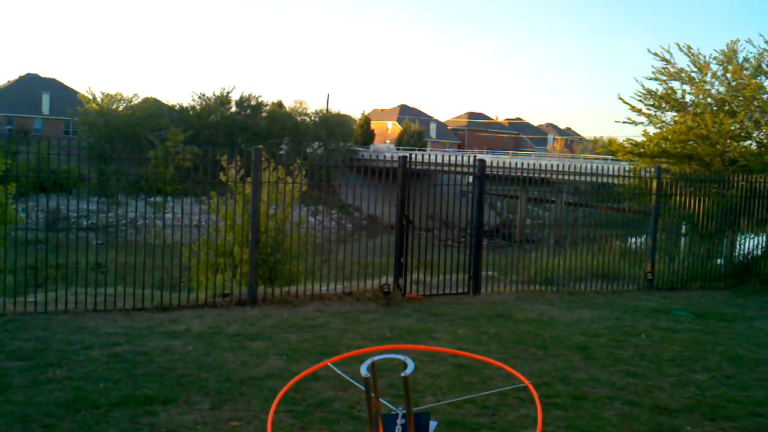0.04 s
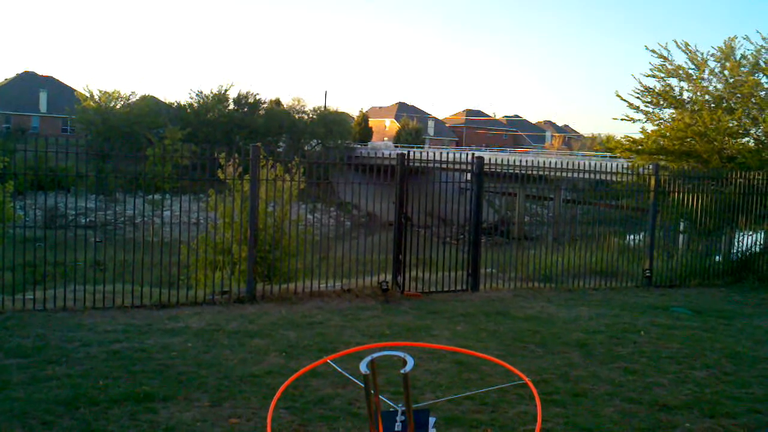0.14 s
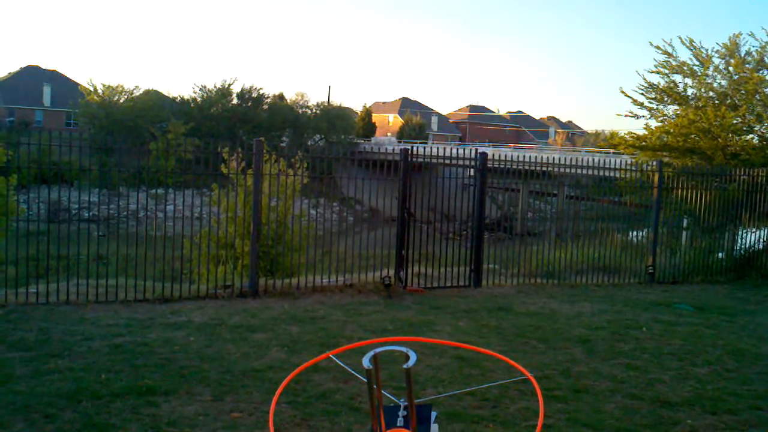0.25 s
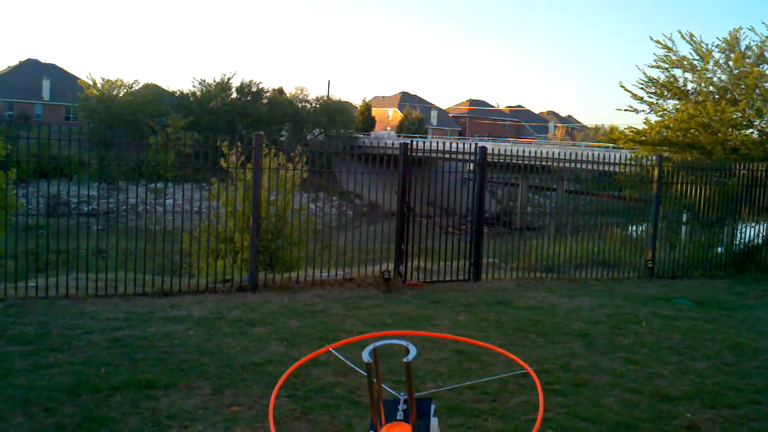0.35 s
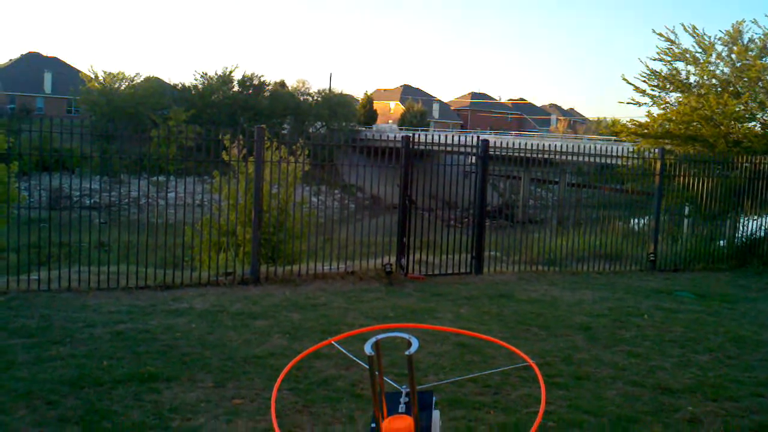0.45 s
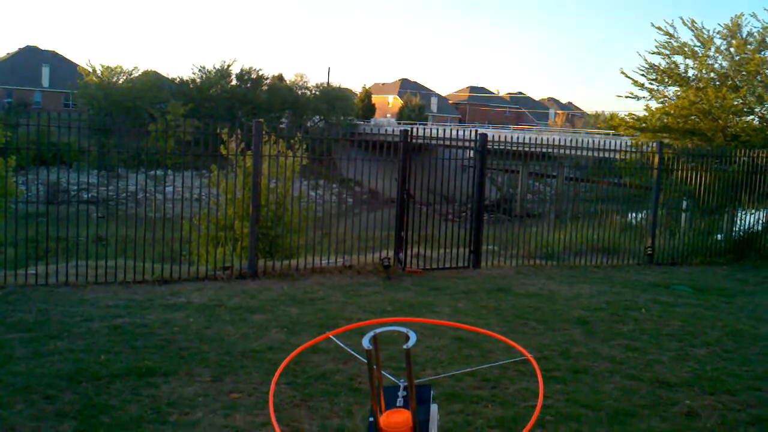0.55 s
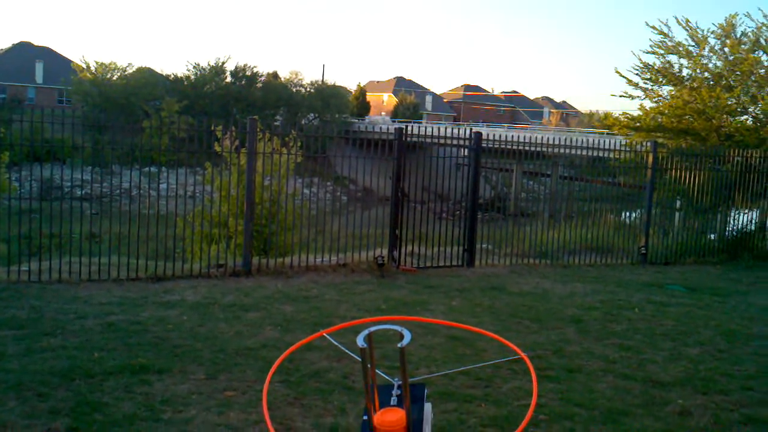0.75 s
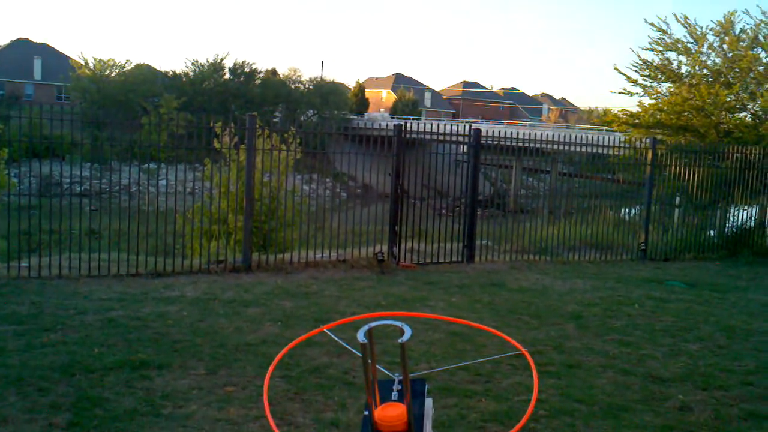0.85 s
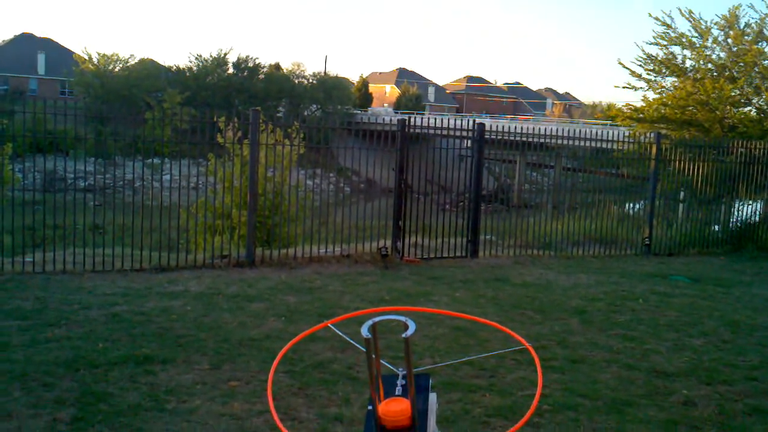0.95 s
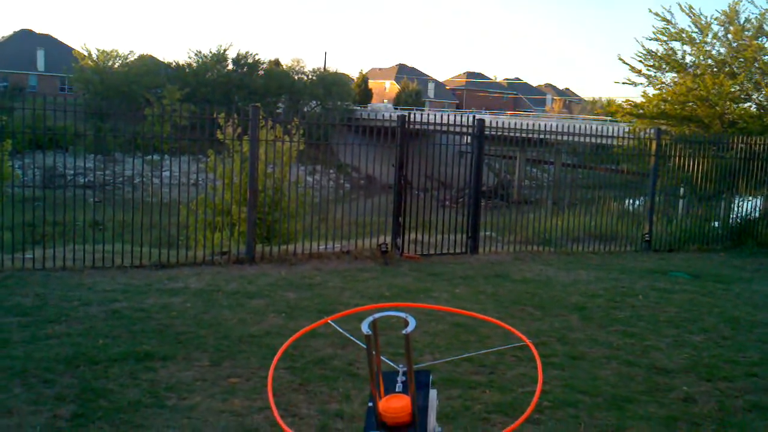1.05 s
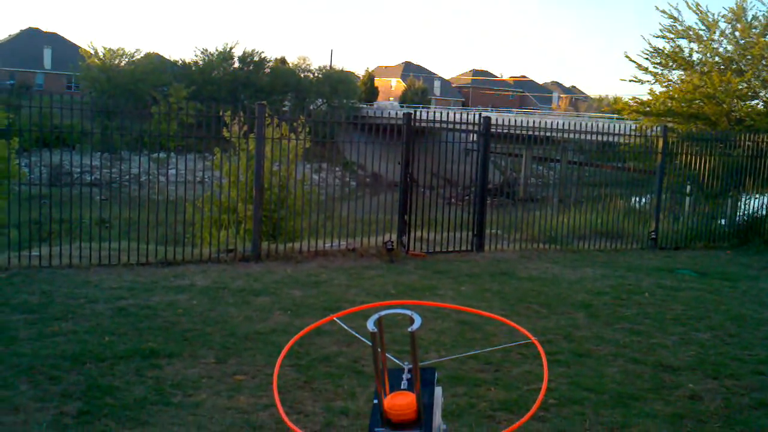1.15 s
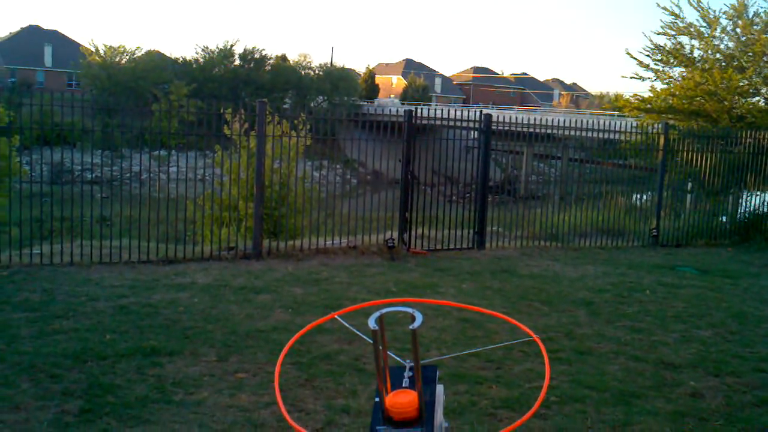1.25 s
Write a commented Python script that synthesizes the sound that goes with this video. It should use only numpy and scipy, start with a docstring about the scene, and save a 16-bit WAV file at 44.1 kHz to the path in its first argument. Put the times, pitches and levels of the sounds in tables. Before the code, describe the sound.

Close steel clack of a clay launcher, then a softer knock, with faint traffic hum outdoors.

```python
"""On a lawn, distant traffic hums throughout, with a faint hiss off to the right. A spring-driven clay
launcher fires just in front of the microphone: its steel arm clacks and chatters, jolting the stand,
and fence and houses return a thin tail. The arm swings back against its stop with a weaker, rattling
knock. A soft rustle follows, and near the end the hiss swells while the traffic grows a little."""
import sys
import numpy as np
from scipy import signal
from scipy.fft import rfft, irfft
from scipy.io import wavfile

SR = 44100
rng = np.random.default_rng(int(sys.argv[2]) if len(sys.argv) > 2 else 0)


def master(y):
    """Save y as 16-bit WAV."""
    cut = np.clip(np.atleast_2d(y).T, -1, 1)
    pcm = np.round(cut * 32767)  # scale
    wavfile.write(sys.argv[1], SR, pcm.astype(np.int16))


N = 57330
BIN_HZ = np.fft.rfftfreq(N, 1 / SR)


def undb(db):
    """Decibels to gain."""
    return 10 ** (np.asarray(db) / 20)


def since(start):
    """Seconds since a moment, zero before it."""
    return np.maximum(np.arange(N) / SR - start, 0)


def over_time(points):
    """Gain along a (time [s], level [dB]) curve."""
    return undb(np.interp(since(0), *np.array(points).T))


def over_bins(points):
    """A (frequency [Hz], value) curve on every frequency bin."""
    hz, value = np.array(points).T
    return np.interp(np.log(BIN_HZ + 1), np.log(hz), value)


def pan(right_db):
    """Left and right gains for a level difference."""
    return undb(np.array([[-.5], [.5]]) * right_db)


def noise(colour, likeness=0, body=1):
    """Unit-level stereo noise with a colour, a left-right correlation (held to -1..1) and resonances."""
    mid, side = rfft(rng.standard_normal((2, N)))
    correlation = np.clip(likeness, -1, 1)
    spectrum = mid * np.sqrt(1 + correlation) + side * np.sqrt(1 - correlation) * np.array([[1], [-1]])
    x = irfft(spectrum * undb(over_bins(colour)) * body, N)
    return x / np.std(x)


def decay(t, t60_s, attack_s=.0003):
    """A quick rise, then a fall of 60 dB in t60_s."""
    return (1 - np.exp(-t / attack_s)) * np.exp(-np.log(1000) * t / t60_s)


def drone(hz, width_hz):
    """A narrow band of noise, heard as a wavering tone of unit level."""
    band = np.exp(-2 * ((BIN_HZ - hz) / width_hz) ** 2)
    x = irfft(rfft(rng.standard_normal(N)) * band, N)
    return x / np.std(x)


# colour of the road from far off (frequency [Hz], relative level [dB])
TRAFFIC_COLOUR = [(25, -9), (50, -12), (80, -4.5), (120, -0.5), (200, -0.5), (320, -1.5), (470, -1.5),
                  (650, -3), (850, 0.5), (1050, 2.5), (1400, -7.5), (2000, -17.5), (2600, -19),
                  (3400, -30.5), (5200, -40.5), (8000, -35), (14000, -34.5)]
# its likeness across the microphone (frequency [Hz], left-right likeness [ratio])
TRAFFIC_LIKENESS = [(60, -0.7), (130, -0.33), (280, 0.4), (620, 0.31), (1100, 1), (2000, 0.38),
                    (2500, -1.3), (2800, -1), (3800, 0.11)]
# its slow rise (time [s], level [dB])
TRAFFIC_LEVEL = [(0, -47.5), (.35, -46), (.65, -46.5), (1.0, -44.5), (1.3, -44.5)]
# drones within it (frequency [Hz], width [Hz], starting level [dB], growth [dB/s])
DRONES = [(204, 32, -64, 1.5), (469, 10, -68, 8), (953.4, 12, -65, 5), (1066.5, 28, -70.5, 13)]
def traffic():
    """Engine hum and tyre roar carry to the lawn from a distant road, slowly growing."""
    roar = noise(TRAFFIC_COLOUR, over_bins(TRAFFIC_LIKENESS)) * over_time(TRAFFIC_LEVEL)
    drones = sum(undb(db + growth * since(0)) * drone(hz, width) for hz, width, db, growth in DRONES)
    return (roar + drones) * pan(right_db=0.1)


# colour of the hiss (frequency [Hz], relative level [dB])
HISS_COLOUR = [(900, -22), (1900, 13.5), (2650, -30.5), (3400, 2), (5400, -13), (7200, -7.5),
               (10000, -20.5), (14000, -16.5)]
# its fade and late swell (time [s], level [dB])
HISS_LEVEL = [(0, -61), (.08, -64.5), (.8, -76), (.9, -61.5), (1.02, -58.5), (1.15, -59.5), (1.3, -68)]
def hiss(left_lag_s=.00025):
    """A faint hiss off to the right, reaching that side of the microphone first."""
    left, right = noise(HISS_COLOUR, likeness=0.34) * over_time(HISS_LEVEL)
    return np.array([np.interp(since(left_lag_s), since(0), left), right])


# blows of the firing arm (time [s], then relative levels: ring [dB], clatter [dB], chink [dB], crack [dB])
CLACK_BLOWS = [(0.1000, 3, -26.5, -46, -19.5), (0.1038, -13.5, -26, -33, -29),
               (0.1293, -28, -27.5, -34, -26), (0.1335, -40, -32, -48, -36), (0.1505, -45, -46, -43, -41),
               (0.1635, -37, -30, -60, -56)]
# modes of the steel arm (frequency [Hz], relative level [dB], t60 [s])
ARM_MODES = [(776, -33.5, .19), (1020, -27.5, .22), (1054, -32, .24), (1138, -39, .18), (1190, -27, .2),
             (1239, -35.5, .17), (1295, -37.5, .22), (1363, -29, .2), (1561, -38.5, .22), (1664, -37, .22),
             (1729, -36.5, .24), (1799, -38.5, .2), (1929, -33, .19), (2762, -43, .27), (2788, -38.5, .27)]
# dense modes of the frame (clatter) and fittings (chink) (frequency [Hz], relative level [dB])
CLACK_CLATTER = [(100, -53), (450, -29), (650, -15), (900, -8), (1200, 6.5), (1430, -15.5), (1700, -5),
                 (2000, 0.5), (2550, -33), (3300, -14.5), (4900, -44), (9000, -44)]
CLACK_CHINK = [(1500, -23), (2600, -4), (3700, 8), (5200, -13), (7000, 9.5), (8200, -6.5), (10300, -4.5),
               (11800, -3.5), (13500, -24)]
def clack():
    """Close to the microphone, the spring throws the steel arm, which strikes and chatters."""
    return strike(CLACK_BLOWS, ARM_MODES, CLACK_CLATTER, CLACK_CHINK, ring_db=1.5)


# colour of the contact itself (frequency [Hz], relative level [dB])
CRACK_COLOUR = [(80, -44), (430, -10.5), (650, -19), (1200, 7.5), (2000, -6.5), (2700, -7), (3700, -3),
                (5200, -35), (7000, -27), (8900, -2.5), (10300, -25.5), (12000, -12.5), (14000, -41)]
# the rattle's likeness across the microphone (frequency [Hz], left-right correlation [ratio])
RATTLE_LIKENESS = [(300, .65), (650, 0.31), (1100, .99), (1900, 0.71), (3000, 0.17), (7000, 0.14)]
def strike(blows, modes, clatter_colour, chink_colour, ring_db):
    """Each blow rings the part's modes, clatters the frame, chinks the fittings and cracks at contact."""
    ring, rattle = 0, 0
    likeness = over_bins(RATTLE_LIKENESS)
    body = resonances()
    for start, modes_db, clatter_db, chink_db, crack_db in blows:
        t = since(start)
        ring += undb(ring_db + modes_db) * ringing(t, modes)
        rattle += undb(clatter_db) * decay(t, t60_s=0.13) * noise(clatter_colour, likeness, body)
        snap_and_fade = undb(1) * decay(t, t60_s=0.0057) + decay(t, t60_s=0.16)
        rattle += undb(chink_db) * (snap_and_fade * noise(chink_colour, likeness, body) + fittings(t))
        rattle += undb(crack_db) * decay(t, t60_s=0.018) * noise(CRACK_COLOUR, likeness)
    # small steel parts radiate little bass
    radiation = signal.butter(2, 505, "high", fs=SR, output="sos")
    return signal.sosfilt(radiation, ring) + rattle


def ringing(t, modes, build_s=.0009):
    """A part's modes build up as the blow spreads through it, then decay."""
    tones = sum(undb(db) * decay(t, t60) * np.sin(2 * np.pi * hz * t) for hz, db, t60 in modes)
    return (1 - np.exp(-t / build_s)) * tones


def resonances(width_hz=70, depth_db=4.5, full_depth_hz=3740):
    """Gain per frequency bin of many small, irregular resonances above the main modes."""
    spread_db = depth_db * np.minimum(BIN_HZ / full_depth_hz, 1) ** 2
    ripple = np.interp(BIN_HZ / width_hz, np.arange(N), rng.standard_normal(N))
    power_excess_db = spread_db ** 2 * np.log(10) / 20
    return undb(spread_db * ripple - power_excess_db)


# modes of the small loose fittings (frequency [Hz], relative level [dB])
FITTING_MODES = [(2520, -15), (3150, -15), (3740, -19), (4451, -15), (4481, -15), (5900, -22), (7272, -13),
                 (8150, -15)]
def fittings(t):
    """Loose steel parts ring and beat; each blow reaches left and right with new phases."""
    phases = rng.uniform(0, 2 * np.pi, (len(FITTING_MODES), 2, 1))
    ring = sum(undb(db) * np.sin(2 * np.pi * hz * t + phase)
               for (hz, db), phase in zip(FITTING_MODES, phases))
    return undb(-0.5) * ring * decay(t, t60_s=0.13)


# low modes of the stand (frequency [Hz], relative level [dB], t60 [s])
STAND_MODES = [(245, -9, .16), (452, 0, .12)]
# jolts that reach it (time [s], level [dB])
JOLTS = [(0.1004, -35.5), (0.2383, -47.5)]
def stand():
    """The two hardest blows jolt the stand, which answers with a low thud."""
    return sum(undb(db) * ringing(since(start), STAND_MODES) for start, db in JOLTS)


# balance of the launcher at the microphone (frequency [Hz], right over left [dB])
RIGHT_BALANCE = [(450, -3), (1000, -1.5), (1900, 2.5), (3500, -1), (8000, 1.5)]
# its lead on the left (frequency [Hz], phase [rad])
LEFT_LEAD = [(1250, 0.5), (1800, 0.16), (2200, 2.65), (2790, 1.74), (3300, 2.9)]
def at_microphone(x):
    """From just in front, the launcher reaches the two sides with unequal level and phase."""
    right_lag = np.exp(-1j * np.array([[0], [1]]) * over_bins(LEFT_LEAD))
    return irfft(rfft(x) * pan(over_bins(RIGHT_BALANCE)) * right_lag, N)


# colour of the yard's tail (frequency [Hz], relative level [dB])
YARD_COLOUR = [(300, -23), (1000, -23), (2000, 5.5), (2700, -0.5), (3900, 6.5), (5200, 12), (6700, 3),
               (9000, 5.5), (13000, 1.5)]
def yard(x, level_db=-15.5, build_s=0.0059):
    """Fence and houses around the lawn scatter thin echoes back to the microphone."""
    t = since(0)
    echoes = noise(YARD_COLOUR) * decay(t, t60_s=0.88) * (1 - np.exp(-t / build_s))
    echoes /= np.sqrt(np.sum(echoes ** 2) / 2)
    return undb(level_db) * signal.fftconvolve(x, echoes, axes=1)[:, :N]


# blows on the stop (time [s], then relative levels: ring [dB], clatter [dB], chink [dB], crack [dB])
KNOCK_BLOWS = [(0.2165, -9.5, -38.5, -54, -72), (0.2346, -14.5, -40, -39, -38),
               (0.2372, 4.5, -32.5, -45.5, -28.5), (0.2533, -16, -32.5, -41, -34),
               (0.2570, -16.5, -43, -50, -36), (0.2650, -15, -48, -51, -36)]
# modes of the stop (frequency [Hz], relative level [dB], t60 [s])
STOP_MODES = [(748, -49, .18), (818, -45, .14), (893, -44, .14), (948, -47, .8), (995, -33, .16),
              (1335, -39, .15), (1925, -38, .13), (3945, -53, .5)]
# frame and fittings as the knock excites them (frequency [Hz], relative level [dB])
KNOCK_CLATTER = [(100, -65), (420, -10), (700, 0.5), (1000, -4), (1450, -9), (1950, 0.5), (2600, -13.5),
                 (3800, -10.5), (9000, -57)]
KNOCK_CHINK = [(2600, -6), (4000, 5.5), (5200, -7.5), (6700, 14.5), (7900, -5.5), (9000, 3), (12000, -6),
               (13800, -13)]
def knock():
    """The arm swings back and rattles against its stop, as close as the clack but weaker."""
    return strike(KNOCK_BLOWS, STOP_MODES, KNOCK_CLATTER, KNOCK_CHINK, ring_db=1)


# swell of the rustle (time [s], width [s], level [dB])
RUSTLE_SWELL = (0.4684, 0.015, -56)
# its colour (frequency [Hz], relative level [dB])
RUSTLE_COLOUR = [(2000, -26), (3400, 8), (5200, -11.5), (7200, 8), (13500, -4.5)]
def rustle():
    """A short, soft rustle after the launch, spread wide across the microphone."""
    centre, width, db = RUSTLE_SWELL
    swell = np.exp(-.5 * ((since(0) - centre) / width) ** 2)
    return undb(db) * swell * noise(RUSTLE_COLOUR)


def scene():
    """The launcher close up and its echo, over the background of the lawn."""
    launcher = at_microphone(clack() + knock() + stand())
    return traffic() + hiss() + launcher + yard(launcher) + rustle()


def record(dry, low_cut_hz=82, top_hz=14000):
    """The recorder thins the deep bass and cuts the top of the treble."""
    thin = signal.sosfilt(signal.butter(2, low_cut_hz, "high", fs=SR, output="sos"), dry)
    return signal.sosfilt(signal.ellip(10, .2, 80, top_hz, fs=SR, output="sos"), thin)


dry = scene()
out = record(dry)
master(out)
```